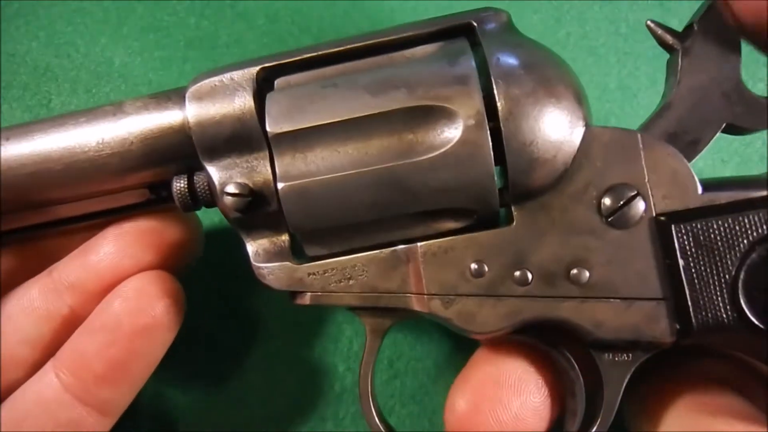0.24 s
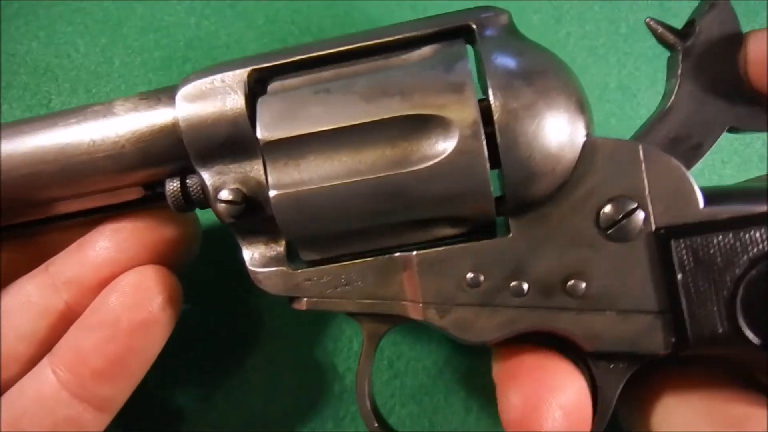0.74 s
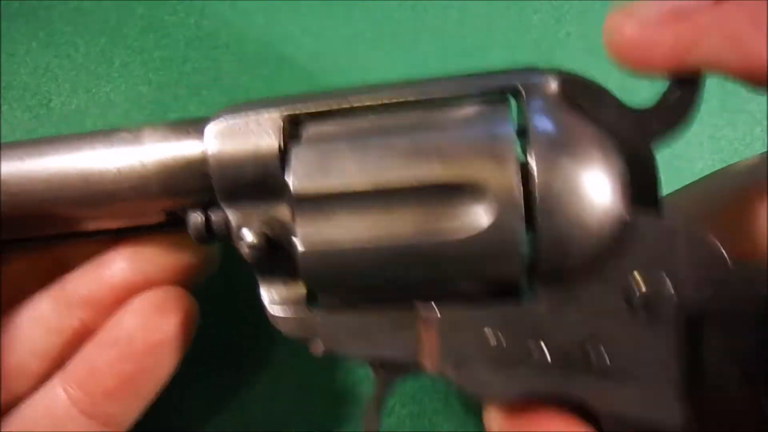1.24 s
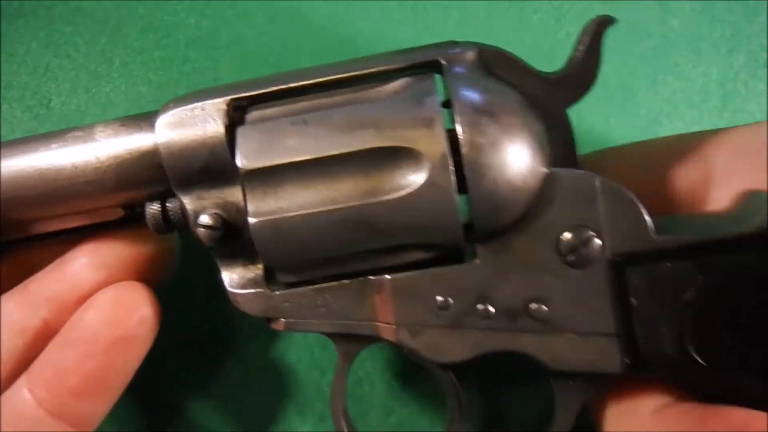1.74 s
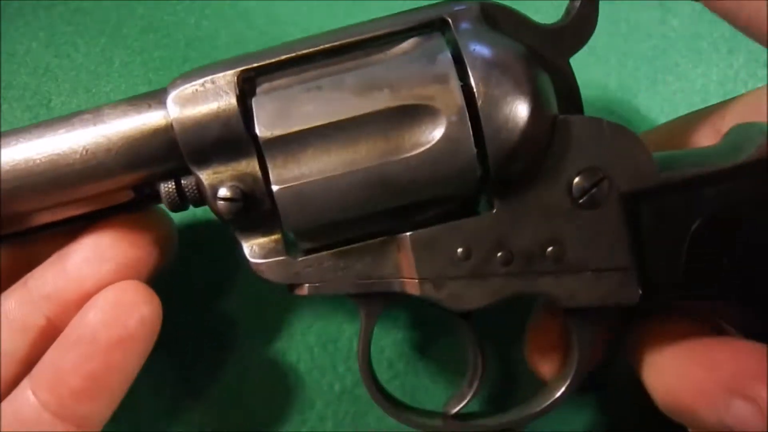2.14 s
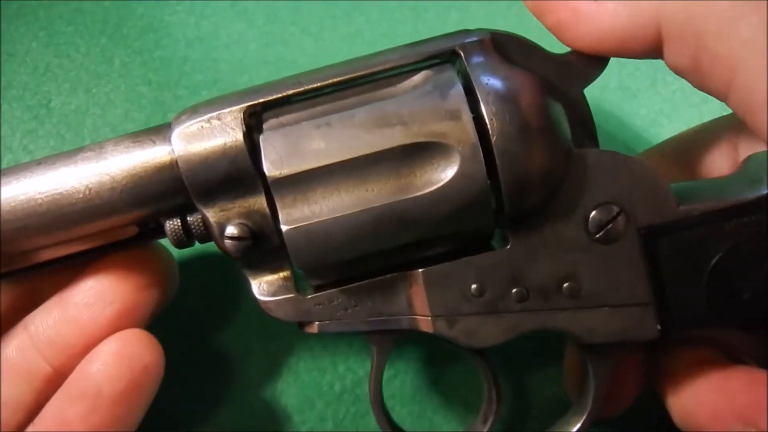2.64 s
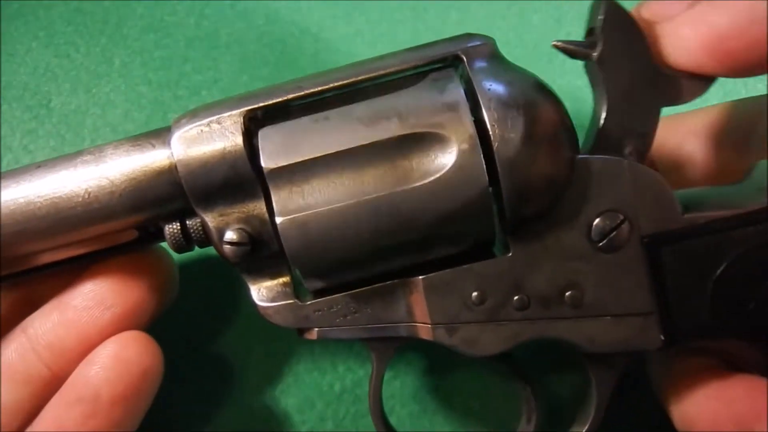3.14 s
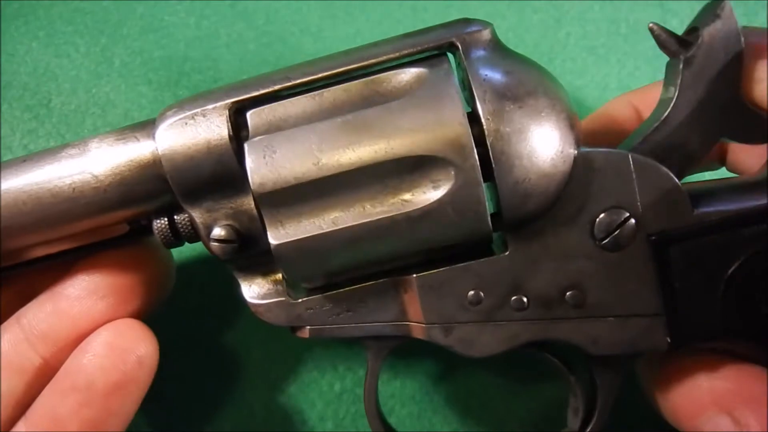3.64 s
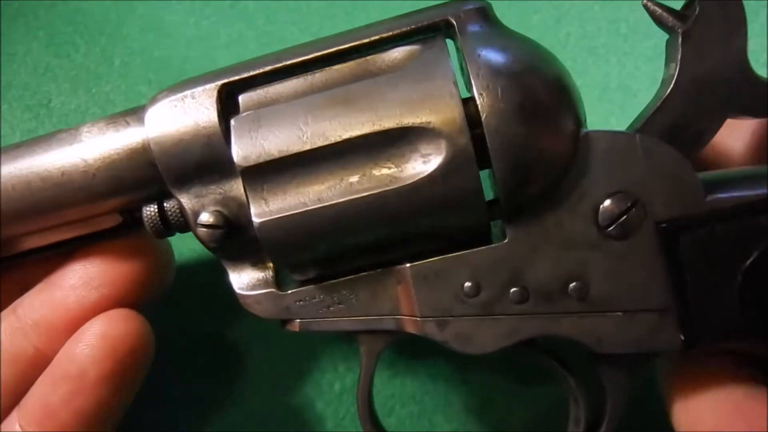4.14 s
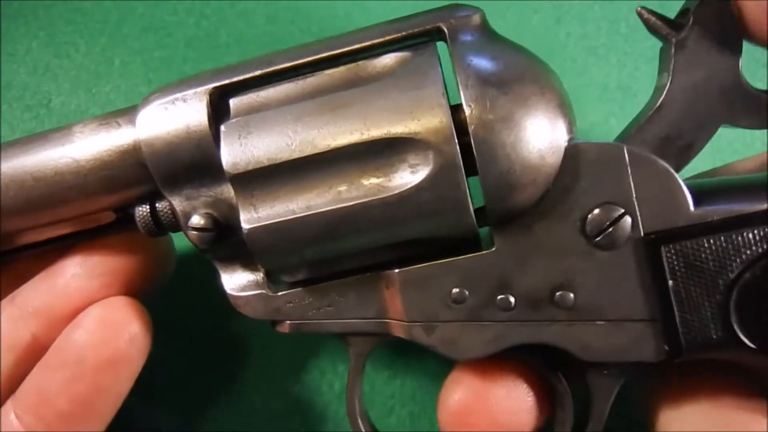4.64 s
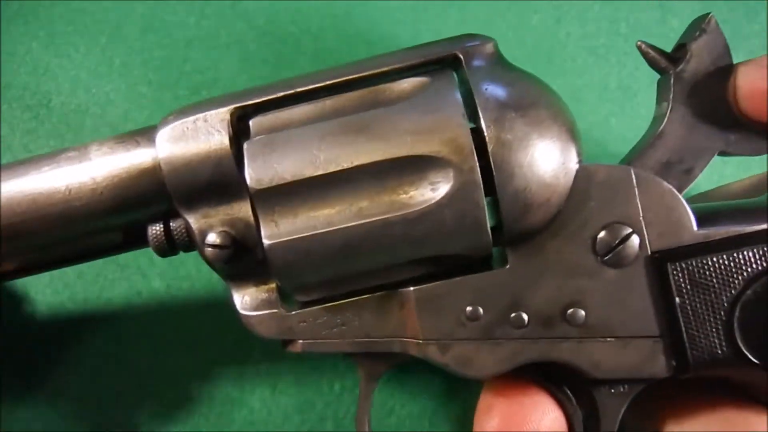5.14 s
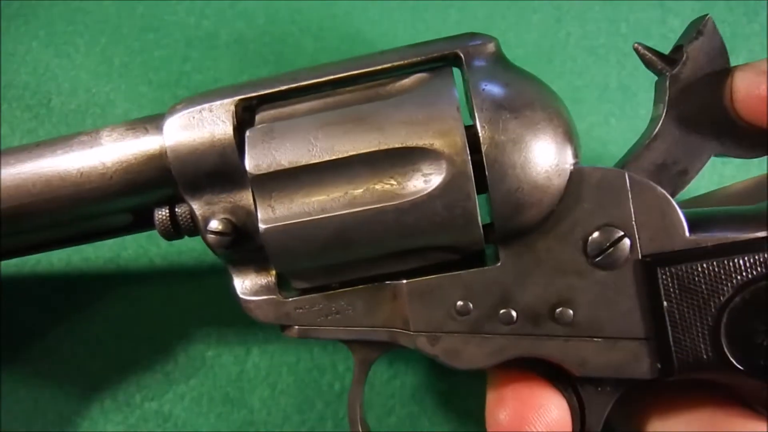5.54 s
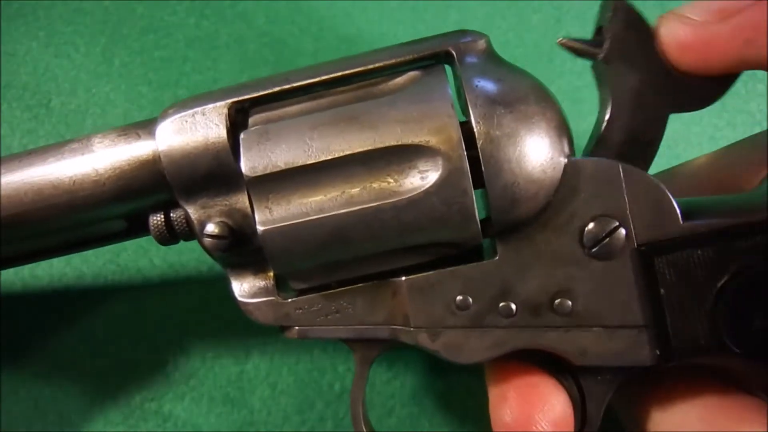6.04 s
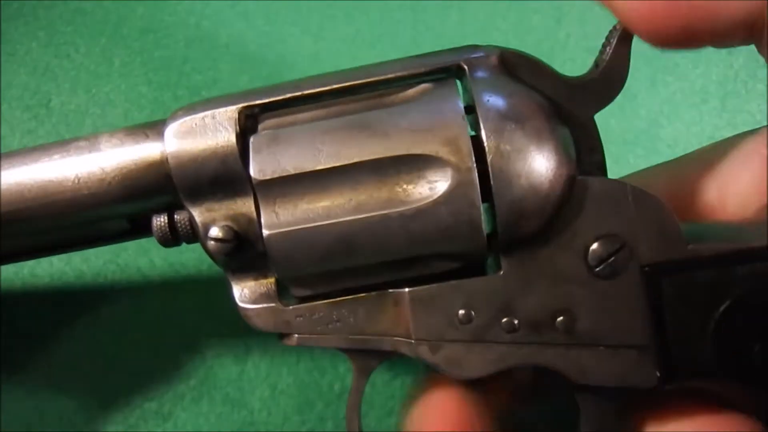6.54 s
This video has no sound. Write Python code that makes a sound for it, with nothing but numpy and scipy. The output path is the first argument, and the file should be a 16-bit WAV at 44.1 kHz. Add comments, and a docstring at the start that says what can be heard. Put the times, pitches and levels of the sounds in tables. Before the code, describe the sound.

Crisp, dry metallic clicks come singly and in quick pairs as a revolver's hammer is lowered, cocked and lowered again, very near the microphone. The first and last snaps are the loudest. Soft skin rubbing and handling rustle fill the gaps, with the tiny ticking of a lens motor. A faint fan-like room noise dips after each loud click and creeps back up.

```python
"""Revolver cocked and let down

A steel revolver is worked by hand, close to a small camera in a quiet room. Hammer, sear and
cylinder stop snap against the frame; fingers slide on the metal; the focus motor ticks faintly.
Each loud click pushes the camera's gain down, and the room noise then creeps back up."""
import sys
import numpy as np
from scipy import signal
from scipy.fft import rfft, irfft
from scipy.io import wavfile
from scipy.ndimage import uniform_filter1d, minimum_filter1d

SR = 44100
rng = np.random.default_rng(int(sys.argv[2]) if len(sys.argv) > 2 else 0)


def pcm_store(signal):
    """Save signal as 16-bit PCM."""
    levels = np.round(np.clip(np.atleast_2d(signal), -1, 1) * 32767)
    wavfile.write(sys.argv[1], SR, levels.astype(np.int16).T)


N = 298977

# a click's thump, knock, low ring, high ring, clink, sizzle and tick: low_hz, high_hz
CLICK_BANDS = [(0, 700), (700, 2400), (2400, 3500), (3500, 4900), (4900, 7500), (7500, 10500),
               (10500, 16000)]


def amp(db):
    """Decibels to gain."""
    return 10 ** (np.asarray(db) / 20)


def unit(x):
    """Scales to rms 1."""
    return x / np.sqrt(np.mean(x ** 2) + 1e-30)


def burst(x):
    """Scales a short sound to the energy of 3 ms at rms 1."""
    return unit(x) * np.sqrt(.003 * SR / x.shape[-1])


def decay(t, t60_s):
    """Envelope that falls 60 dB in t60_s."""
    return np.exp(-np.log(1000) * t / t60_s)


def curve(points, hz, column=1):
    """One column of a spectrum table, interpolated over log frequency."""
    table = np.array(points, float)
    return np.interp(np.log(hz + 1), np.log(table[:, 0] + 1), table[:, column])


def add(mix, start_s, sound):
    """Mixes a stereo sound in at start_s."""
    part = mix[:, max(round(start_s * SR), 0):][:, :sound.shape[1]]
    part += sound[:, :part.shape[1]]


def band(x, low_hz, high_hz, order=2):
    """Causal band-pass."""
    return signal.sosfilt(signal.butter(order, [low_hz, high_hz], "band", fs=SR, output="sos"), x)


def minimum_phase(gain):
    """Impulse response with this two-sided spectrum and nothing before its attack."""
    return np.fft.ifft(np.exp(np.conj(signal.hilbert(np.log(gain))))).real


def room_tone(noise_db=-53.5, waver_rad=.7, waver_hz=5):
    """Fan-like room noise with a wavering hum, and the hiss of the microphone."""
    # colour of the noise and hiss: freq_hz, relative_db
    spectrum = [(25, -24.5), (65, -12.5), (120, -2.5), (270, -2.5), (520, -0.5), (850, -3.5), (1350, 1),
                (1850, -3.5), (2100, -12), (2400, -11.5), (3500, -15), (5500, -31), (8000, -29),
                (11500, -19.5), (15500, -16), (16000, -33.5)]
    # how alike left and right are: freq_hz, coherence
    likeness = [(60, 0.4), (200, 0.27), (700, 0.3), (1400, 0.38), (3000, 0), (15000, 0.04)]
    # tones of the hum: pitch_hz, level_db
    hum_tones = [(120, -70.5), (249, -69.5), (500, -70)]
    hz, t = np.fft.rfftfreq(N, 1 / SR), np.arange(N) / SR
    left, other = rfft(rng.standard_normal((2, N)))
    coherence = curve(likeness, hz)
    right = coherence * left + np.sqrt(1 - coherence ** 2) * other
    noise = irfft(np.array([left, right]) * amp(curve(spectrum, hz)), N)
    drifts = unit(irfft(rfft(rng.standard_normal((len(hum_tones), N))) / (1 + (hz / waver_hz) ** 4), N))
    hum = sum(amp(level_db) * unit(np.sin(2 * np.pi * pitch_hz * t + waver_rad * drift))
              for (pitch_hz, level_db), drift in zip(hum_tones, drifts))
    return amp(noise_db) * unit(noise) * amp([[-.4], [.4]]) + hum


def focus_motor(frame_rate_hz=29.97, push_s=.0016, whirr_hz=4330, left_db=-7, size=2400):
    """The lens steps in spells: each step a soft buzz with a weak octave, a scrape and a thin whirr."""
    # spells of one step a frame: start_s, end_s, start_db, end_db
    spells = [(.75, .902, -53.5, -51), (1.0, 2.306, -50.5, -46.5), (3.1, 3.95, -47.5, -49),
              (3.947, 4.74, -45.5, -50)]
    # harder steps of the lens, sounding like the others but louder: time_s, level_db
    jumps = [(.825, -44), (2.326, -43), (2.393, -42), (3.225, -43), (3.428, -43.5), (3.963, -48),
             (4.061, -53), (4.196, -52), (4.297, -46), (4.594, -44), (4.662, -44), (4.728, -45),
             (4.965, -49)]
    out, t = np.zeros((2, N)), np.arange(size) / SR - .006  # the push peaks at t = 0
    frames_s = np.arange(.0235, N / SR, 1 / frame_rate_hz)
    steps = [(time_s, np.interp(time_s, [start_s, end_s], ramp_db) + rng.uniform(-5.28, 7.04))
             for time_s in frames_s
             for start_s, end_s, *ramp_db in spells if start_s < time_s < end_s]
    for time_s, level_db in steps + jumps:
        push = rng.standard_normal((2, size)) * np.exp(-(t / push_s) ** 2 / 2)
        buzz = burst(band(push, 3650, 4450))
        octave = burst(band(push, 7600, 8800, order=1))
        scrape = burst(band(push, 2700, 6500, order=1))
        pitch_hz = whirr_hz * (1 + .014 * rng.standard_normal())
        whirr = burst(np.sin(2 * np.pi * pitch_hz * t) * (t > 0) * decay(t, t60_s=.088))
        tick = buzz + amp(-15) * octave + amp(-10) * (scrape + whirr)
        add(out, time_s + t[0], amp(level_db) * amp([[left_db], [0]]) * tick)
    return out


def swells(moves, rest_db):
    """Gain curve: each move swells and fades as a bell, half power at its ends, over a resting level."""
    t = np.arange(N) / SR
    power = sum(amp(level_db) ** 2 * .5 ** ((2 * (t - middle_s) / length_s) ** 2)
                for middle_s, length_s, level_db in moves)
    return np.sqrt(amp(rest_db) ** 2 + power)


def fingers(body, grain_db=1.56):
    """Skin drags over the steel as a fine grainy hiss; the hands add a dull rustle."""
    # a finger slides on the metal: middle_s, length_s, level_db
    slides = [(.23, 0.13, -56.5), (.86, 0.14, -62), (1.38, 0.18, -54), (1.92, 0.17, -54), (3.22, 0.26, -62),
              (3.85, 0.7, -66), (4.52, .28, -60), (5.14, 0.095, -58), (5.4, 0.13, -57.5), (6.12, 0.14, -61),
              (6.25, 0.049, -60), (6.45, 0.15, -60.5), (6.76, 0.12, -57.5)]
    # the hand shifts its grip: middle_s, length_s, level_db
    grip_shifts = [(.22, 0.63, -55), (.9, 0.6, -59.5), (1.9, 1.4, -59), (5.42, 0.1, -58),
                   (6.04, 0.22, -51.5)]
    drag = rng.standard_normal((2, N))
    drag *= amp(grain_db * unit(uniform_filter1d(rng.standard_normal(N), 200)))
    rubbed_steel = signal.oaconvolve(drag, body, axes=1)[:, :N]
    hiss = unit(band(rubbed_steel, 2200, 12000, order=1))
    grip = rng.standard_normal(N) + .69 * rng.standard_normal((2, N))  # centre plus stereo width
    rustle = unit(band(grip, 190, 420))
    return swells(slides, rest_db=-68.5) * hiss + swells(grip_shifts, rest_db=-68.5) * rustle


def steel_body(size=2048):
    """The gun's answer to one sharp tap, at each microphone port: a crack plus short ringing modes."""
    # the bare crack under the ringing: freq_hz, left_db, right_db
    crack = [(40, -11.5, -13), (410, -15.5, -14.5), (1035, -18.5, -17.5), (1963, -28.5, -13.5),
             (3530, -12.5, -10), (5130, -32, -15), (6530, -13, -30), (9700, -16.5, -16),
             (10830, -24.5, -24), (12200, -20, -30.5), (15800, -17.5, -41.5)]
    # resonances of the steel: pitch_hz, t60_s, left_db, right_db
    modes = [(1265, 0.0045, -24, -11), (2875, 0.0048, -18.5, -4), (3730, 0.006, -17, -6),
             (4163, 0.0084, -26.5, 2), (4430, .008, -5.5, -25.5), (5230, 0.0061, -40.5, -6),
             (5910, 0.017, -11.5, -23.5), (6180, .008, -8.5, -37), (7850, 0.0033, -11, -21.5),
             (8360, 0.017, -15.5, -8.5), (8800, 0.0072, -15, -15.5), (11460, 0.001, -15.5, -17.5),
             (13600, 0.0071, -14, -27), (14350, 0.0046, -26, -20)]
    hz = abs(np.fft.fftfreq(size, 1 / SR))
    power = amp([curve(crack, hz, column=1), curve(crack, hz, column=2)]) ** 2
    for pitch_hz, t60_s, *port_db in modes:
        width_hz = np.log(1000) / (2 * np.pi * t60_s)
        power += amp(port_db)[:, None] ** 2 / (1 + ((hz - pitch_hz) / width_hz) ** 2 / 2) ** 2
    return minimum_phase(np.sqrt(power))


def contact_colour(tilt_db_per_octave, favoured_hz, lift_db, width_octaves=.19):
    """One contact's share of energy per band, in dB: tilted, and lifted around one resonance."""
    # a middling contact, one value per click band: share_db
    plain_share_db = [-19, -15, -12.5, -9.5, -10.5, -9, -11]
    octaves = np.log2(np.mean(CLICK_BANDS, 1) / favoured_hz)
    resonance_db = lift_db * np.exp(-(octaves / width_octaves) ** 2 / 2)
    band_db = np.array(plain_share_db) + tilt_db_per_octave * octaves + resonance_db
    return band_db - 10 * np.log10((amp(band_db) ** 2).sum())


def recolour(x, share_db, passes=3):
    """Smooth causal equaliser that steers each click band towards its share of the energy."""
    hz = abs(np.fft.fftfreq(x.shape[1], 1 / SR))
    power = (abs(np.fft.fft(x)) ** 2).sum(0)
    gain = np.ones(len(hz))
    for _ in range(passes):
        band_power = [(power * gain ** 2)[(hz >= low) & (hz < high)].sum() for low, high in CLICK_BANDS]
        boost_db = share_db - 10 * np.log10(np.array(band_power) / power.sum())
        gain *= amp(np.interp(hz, np.mean(CLICK_BANDS, 1), boost_db))
    return signal.fftconvolve(x, minimum_phase(gain)[None], axes=1)[:, :x.shape[1]]


def action_clicks(body, chatter=2.74, centre=.87, size=4096):
    """Steel parts snap together: a tap and a dying chatter ring the gun, favouring the part struck."""
    # contacts of the parts:
    # start_s, level_db, tilt_db_per_octave, favoured_hz, lift_db, left_over_right_db, chatter_t60_s
    contacts = [(0.8787, -18.5, -0.3, 5090, 16.5, -1, 0.0099), (0.9117, 5, -2, 4610, 8, -5.5, 0.004),
                (1.4308, -2, 2.1, 7550, 3.5, 2.5, 0.0064), (1.613, -39.5, -1.5, 9000, 8, 0, 0.0058),
                (1.635, -44, 4, 8900, 6, 1, .009), (1.6819, -9, 6.5, 6860, 0, 9, 0.017),
                (1.7060, -13.5, 3, 2900, 10, -17, 0.0044), (1.7089, -5.5, 1.9, 4900, 10.5, 7, .011),
                (3.0341, -7, -0.06, 10730, 18.5, 2.5, 0.0077), (3.2811, -41, -3, 2900, 4, 5, 0.0074),
                (3.2904, -10, 3, 6800, 2, 2.5, 0.0083), (3.643, -50, 0, 9000, 7, 2, .008),
                (3.734, -11.5, 0.1, 5190, 3.5, -1, 0.0073), (4.0194, -42.5, -3.8, 4200, 0, 1, 0.019),
                (4.795, -50.5, -4, 2900, 4, -7, .008), (5.6136, -18, 1, 4470, 9.5, -2.5, 0.0078),
                (5.6543, -7, -1.3, 4060, 8, -9, 0.0056), (5.6565, -10.5, -0.2, 1500, 8.5, -0.5, 0.022),
                (5.667, -28, -1, 1500, 6, -1, .096), (6.5367, -7, -0.95, 6600, 1, -2, 0.0057),
                (6.691, -36.5, 1, 1300, 32, -1, 0.007), (6.707, -34.5, 7, 1300, 7, 0, .009),
                (6.7299, -9, 2.5, 7900, 11, 1, 0.021), (6.7358, 1, -0.36, 3450, 11, 0, 0.0086)]
    out, t = np.zeros((2, N)), np.arange(size) / SR
    for start_s, level_db, tilt, favoured_hz, lift_db, pan_db, t60_s in contacts:
        share_db = contact_colour(tilt, favoured_hz, lift_db)
        noise = rng.standard_normal((3, size))  # centre, left, right
        force = (centre * noise[0] + np.sqrt(1 - centre ** 2) * noise[1:]) * decay(t, t60_s)
        force *= chatter * np.sqrt(t60_s / .005) / np.linalg.norm(force[0])  # longer chatter weighs more
        force[:, 0] += 1  # the tap
        ring = recolour(signal.fftconvolve(force, body, axes=1)[:, :size], share_db)
        ring = ring / np.linalg.norm(ring, axis=1, keepdims=True) * amp([[pan_db], [0]])
        add(out, start_s, amp(level_db) * recolour(burst(ring), share_db))
    return np.array([np.roll(out[0], 2), out[1]])  # the left port is slightly farther away


def room_reverb(x, build_s=.0067, echo_s=.0054, echo_db=-38):
    """The room answers with one early reflection and a faint tail whose bass lasts longest."""
    # decay of the room: freq_hz, t60_s
    decay_times = [(150, .35), (1000, 0.098), (4000, 0.16), (9000, 0.069), (15000, 0.11)]
    hz, t, noise = signal.stft(rng.standard_normal((2, SR // 2)), SR, nperseg=256)
    tail = signal.istft(noise * decay(t, curve(decay_times, hz)[:, None]), SR, nperseg=256)[1]
    tail *= np.minimum(np.arange(tail.shape[1]) / SR / build_s, 1)
    tail *= amp(-31) / np.linalg.norm(tail[0])
    tail += amp(3) * band(tail, 6800, 11000, order=1)  # the steel radiates most here
    tail[:, round(echo_s * SR)] += amp(echo_db)
    return signal.oaconvolve(x, tail, axes=1)[:, :N]


def scene():
    """The gun in its room, with the hands and the camera's own motor."""
    body = steel_body()
    clicks = action_clicks(body)
    return clicks + room_reverb(clicks) + fingers(body) + focus_motor() + room_tone()


def gain_control(x, threshold_db=-34, slope=.99, hold_s=.091, recovery_db_per_s=16.5):
    """The camera senses the sharp treble, ducks just ahead of a peak, holds, then recovers steadily."""
    treble_power = (band(x, 4900, 7500, order=4) ** 2).mean(0)
    treble_db = 10 * np.log10(abs(uniform_filter1d(treble_power, size=132)) + 1e-14)
    cut_db = slope * np.maximum(treble_db - threshold_db, 0)
    hold_samples = 2 * int(hold_s * SR / 2) + 1
    held_db = -minimum_filter1d(-cut_db, hold_samples, origin=hold_samples // 2)
    ramp_db = np.arange(N) / SR * recovery_db_per_s
    released_db = np.maximum.accumulate(held_db + ramp_db) - ramp_db
    look_ahead_db = -minimum_filter1d(-released_db, size=121)
    return x / amp(uniform_filter1d(look_ahead_db, size=41))


def record(dry):
    """Notch filters, gain control and the band limit of the camera."""
    # the camera's notches, the middle one in two stages: centre_hz, width_hz
    notches = [(2490, 170), (4960, 230), (5080, 590), (7500, 200)]
    for centre_hz, width_hz in notches:
        dry = signal.lfilter(*signal.iirnotch(centre_hz, centre_hz / width_hz, SR), dry)
    low_pass = signal.firwin(255, 16100, window=("kaiser", 8), fs=SR)
    return signal.oaconvolve(gain_control(dry), low_pass[None], "same")


dry = scene()
out = record(dry)
pcm_store(out)
```